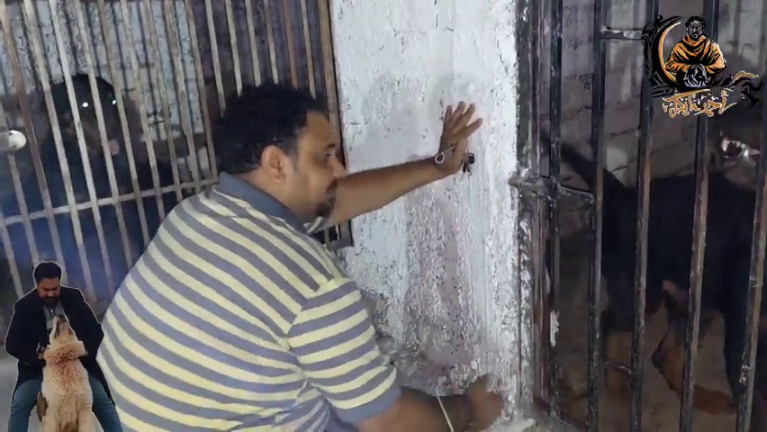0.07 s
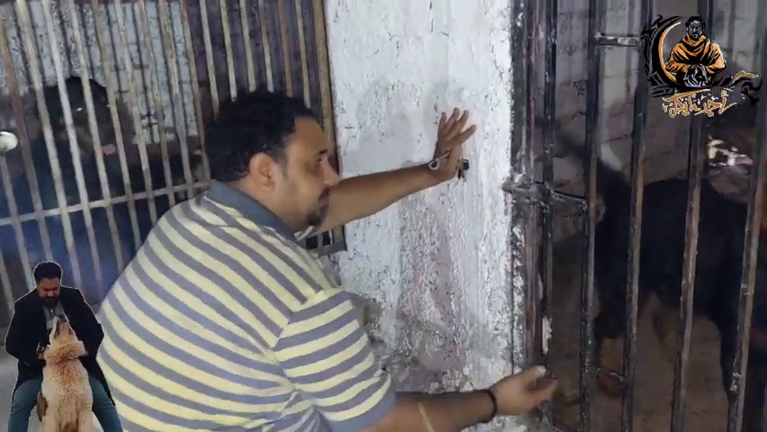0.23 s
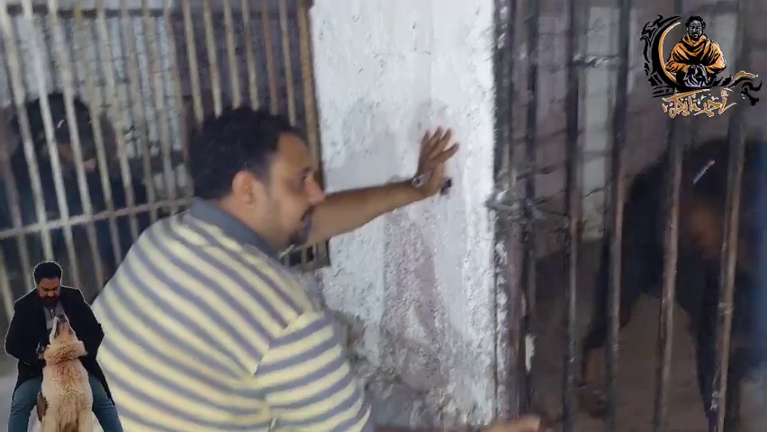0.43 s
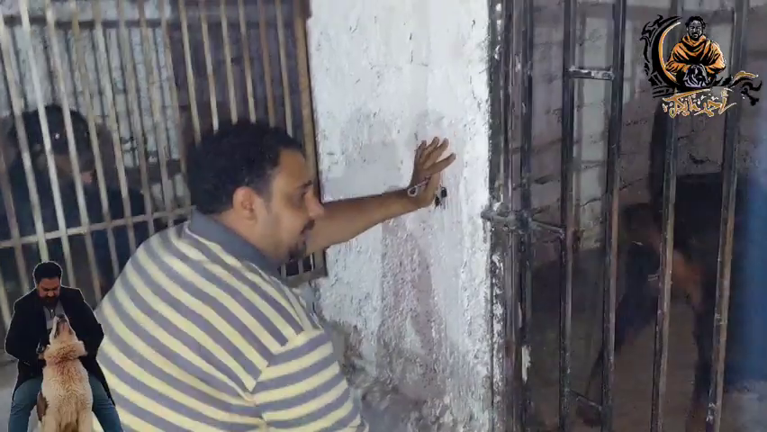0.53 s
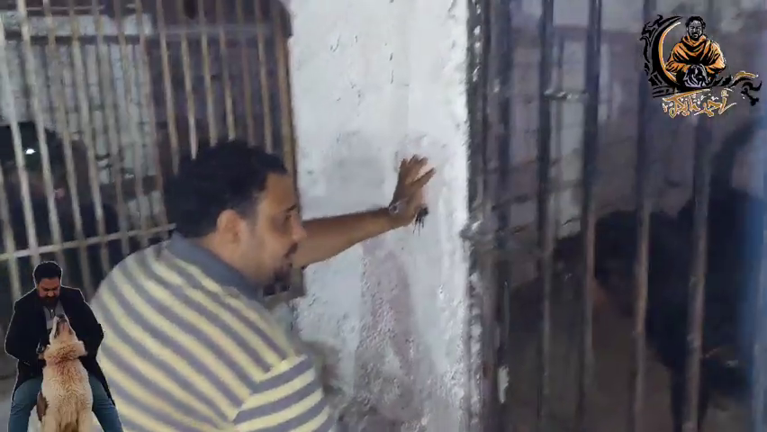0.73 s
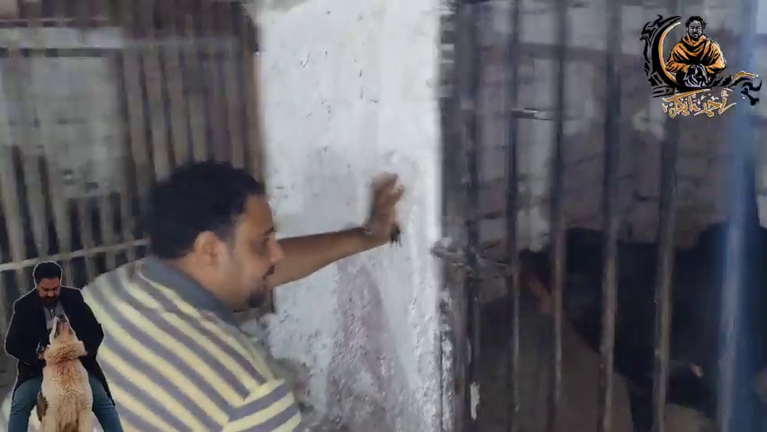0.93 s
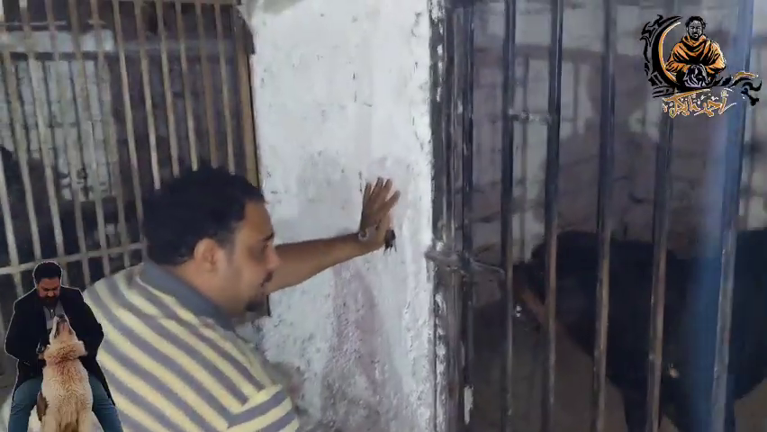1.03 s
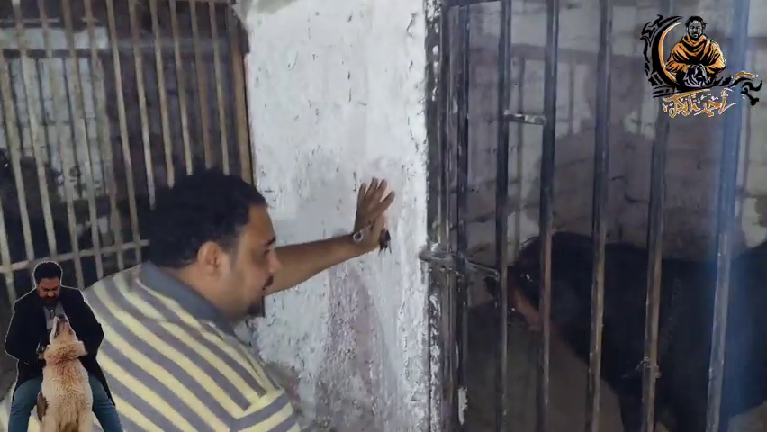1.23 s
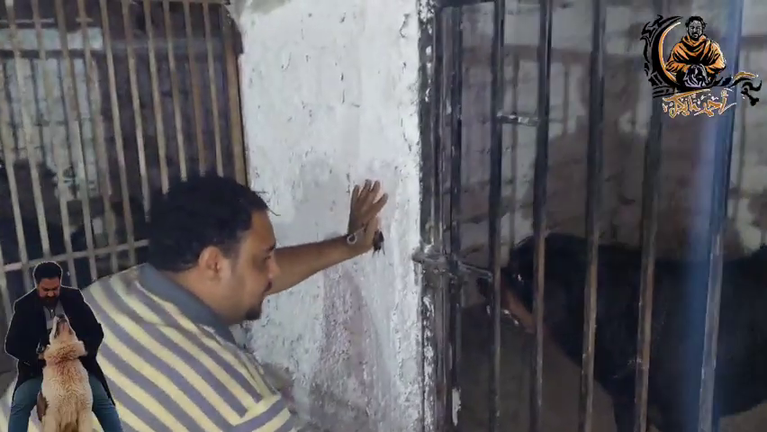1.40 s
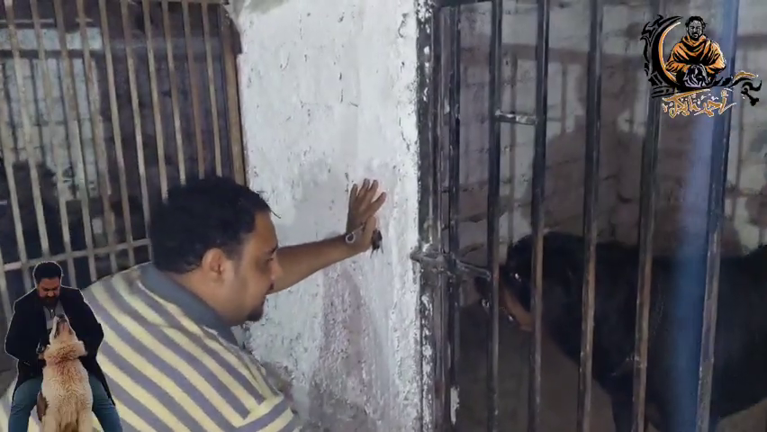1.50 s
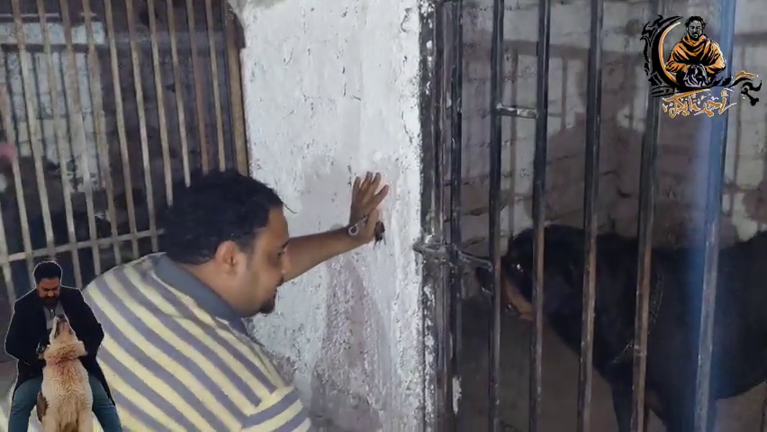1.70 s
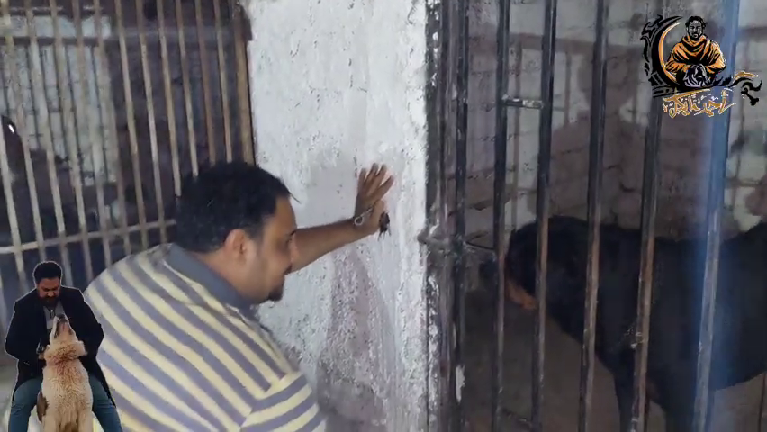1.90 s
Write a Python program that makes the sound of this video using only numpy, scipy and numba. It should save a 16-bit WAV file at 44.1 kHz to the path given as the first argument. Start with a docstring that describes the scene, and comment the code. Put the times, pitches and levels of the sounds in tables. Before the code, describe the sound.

Dogs barking in a bare barred kennel, caught by a nearby phone: two farther barks, three strong close ones, then light chain clinks, pants, soft paw thuds, one faint far bark and a groan.

```python
"""A dog further off barks twice over a brief low drone; then a big dog, close to a phone, barks three times.
They are behind the bars of a bare concrete kennel. The far dog barks once more and trails into a groan.
A collar chain clinks, the near dog pants, paws thud; the hard cell rings and room air lies underneath.
Barks are uneven pulses and gated noise through resonances; pants are filtered noise; links are decaying modes;
thuds and drone are sines. Cell modes, scattered wall echoes and a delay network make the room."""
import sys
import numpy as np
from scipy import signal
from scipy.fft import rfft, irfft
from scipy.io import wavfile
from scipy.ndimage import uniform_filter1d
from numba import njit

SR = 44100
rng = np.random.default_rng(int(sys.argv[2]) if len(sys.argv) > 2 else 0)


def decibels_to_gain(level_db):
    """Convert a level in decibels to a linear amplitude gain (20 dB per decade)."""
    exponent = np.asarray(level_db, float) / 20
    return 10 ** exponent


def log_audio(samples):
    """Write samples as a 16-bit WAV file to the path given in sys.argv[1]."""
    # one column per channel
    frames = np.atleast_2d(samples).T
    # limit to full scale, then quantise
    limited = np.clip(frames, -1, 1)
    pcm = np.round(limited * 32767).astype(np.int16)
    wavfile.write(sys.argv[1], SR, pcm)


N = 85995
T = np.arange(N) / SR


def on_log(table, hz):
    """Interpolates (Hz, value) points on a log frequency axis."""
    points = np.array(table, float)
    return np.interp(np.log(np.maximum(hz, 1)), np.log(points[:, 0]), points[:, 1])


def unit(x):
    """Scales to rms 1."""
    return x / np.sqrt(np.mean(x ** 2))


def even(x):
    """Flattens the short-term rms to 1."""
    return x / np.sqrt(uniform_filter1d(x ** 2, size=1300) + 1e-12)


@njit
def svf(x, hz, width):
    """State-variable band-pass with a moving centre, gain 1 there."""
    y, band_state, low_state = np.empty(len(x)), 0., 0.
    for i in range(len(x)):
        g, k = np.tan(np.pi * hz[i] / SR), width / hz[i]
        v = (band_state + g * (x[i] - low_state)) / (1 + g * (g + k))
        band_state = 2 * v - band_state
        low_state += 2 * g * v
        y[i] = k * v
    return y


def band(x, hz, width_hz):
    """Steep resonance: two band-passes in series, each 1.2 times the nominal width."""
    hz = hz + np.zeros(len(x))
    return svf(svf(x, hz, 1.2 * width_hz), hz, 1.2 * width_hz)


def ring(x, modes, settle=False):
    """Sum of decaying modes (Hz, dB, t60 s); settle scales each to unit energy."""
    out = 0
    for hz, db, t60_s in modes:
        pole = np.exp(2j * np.pi * hz / SR - np.log(1000) / (t60_s * SR))
        scale = np.sqrt(1 - abs(pole) ** 2) if settle else 1
        out = out + decibels_to_gain(db) * signal.lfilter([1], [1, -pole], x).imag * scale
    return out


# Spectrum of the room air. Each row: frequency in Hz, level in dB.
AIR_SPECTRUM = [(25, -23), (60, -8), (100, -1.5), (200, -3.5), (330, 4.5), (700, -8.5), (2000, -12.5),
                (3000, -18.5), (6000, -18), (9000, -25), (12000, -27), (16000, -26)]
# Course of the air. Each row: time in s, treble level in dB before AIR_GAIN_DB, bass relative to treble in dB.
AIR_COURSE = [(0.0, -59.5, 17), (0.536, -55, 10), (0.65, -63.5, 6), (0.847, -61.5, 14), (0.994, -65, 16.5),
              (1.432, -75.5, 13.5), (1.678, -72.5, 7), (1.95, -76.5, 13)]
AIR_GAIN_DB = 12


def air():
    """Room air and rumble: shaped stereo noise, bass and treble moving apart, mostly sinking."""
    f = np.fft.rfftfreq(N, 1 / SR)
    time_s, treble_db, bass_db = np.array(AIR_COURSE).T
    mid, side = rfft(rng.standard_normal((2, N))) * decibels_to_gain(on_log(AIR_SPECTRUM, f))
    # share of side noise by Hz
    side = side * on_log([(50, 0.97), (150, .3), (2000, 0.95), (5500, 1.0), (7000, .15)], f)
    both = np.array([mid + side, mid - side]) / np.sqrt(np.mean(irfft(mid, N) ** 2))
    low = 1 / (1 + (f / 250) ** 4)
    treble = irfft(both * (1 - low), N)
    bass = irfft(both * low, N)
    level = decibels_to_gain(AIR_GAIN_DB + np.interp(T, time_s, treble_db))
    return level * (treble + decibels_to_gain(np.interp(T, time_s, bass_db)) * bass)


# Low drone. Each row: time in s, frequency in Hz, rms level in dB.
DRONE_COURSE = [(0.0, 106.3, -44), (0.086, 91.8, -37), (0.128, 100.4, -46), (0.148, 101, -41.5),
                (0.226, 94.8, -39.5), (0.318, 104.3, -29.5), (0.42, 96, -61.5)]


def drone():
    """A low sine of gliding pitch that swells, then fades out."""
    time_s, hz, db = np.array(DRONE_COURSE).T
    level_db = np.interp(T, time_s, db) - 400 * np.maximum(T - time_s[-1], 0)
    phase = 2 * np.pi * np.cumsum(np.interp(T, time_s, hz)) / SR
    return np.sqrt(2) * decibels_to_gain(level_db) * np.sin(phase)


@njit
def walls(x, lags, gain, damp):
    """Eight delay lines that feed each other, duller each round."""
    line, soft, out = np.zeros((8, 4096)), np.zeros(8), np.zeros((2, len(x)))
    for i in range(len(x)):
        total = 0.
        for k in range(8):
            soft[k] += (1 - damp) * (gain[k] * line[k, (i - lags[k]) & 4095] - soft[k])
            total += soft[k]
            out[k % 2, i] += soft[k]
        for k in range(8):
            line[k, i & 4095] = x[i] + soft[k] - total / 4
    return out


HALL_DB, HALL_T60_S, HALL_DAMP = -18, .5, 0.54  # t60 before damping


def hall(x):
    """Diffuse tail: delay-line gains set the decay, damping shortens the treble."""
    lags = np.array([521, 683, 877, 1031, 1259, 1493, 1787, 2113])
    return decibels_to_gain(HALL_DB) * walls(x, lags, decibels_to_gain(-60 * lags / SR / HALL_T60_S), HALL_DAMP)


WALLS_DB, WALLS_S = -5, .014


def first_echoes(x):
    """Sparse random reflections off the cell walls, unlike left and right, mostly above the bass."""
    n = int(WALLS_S * SR)
    taps = rng.standard_normal((2, n)) * (rng.random((2, n)) < .04)
    taps = taps / np.sqrt(np.sum(taps ** 2, axis=1, keepdims=True))
    x = signal.sosfilt(signal.butter(1, (700, 6000), "band", fs=SR, output="sos"), x)
    return decibels_to_gain(WALLS_DB) * signal.fftconvolve(x[None], taps, axes=1)[:, :N]


# Ringing of the cell. Each row: frequency in Hz, relative level in dB, t60 in s.
CELL_MODES = [(317, -4, .11), (358, -6, .12), (454, -1, .14), (520, 5, .12), (650, -4, .12), (688, -1, .12),
              (766, 0, .12), (815, 2, .16), (930, -8, .1), (1205, -7, .1), (1535, -1, .14), (1612, -4, .12)]
CELL_DB = -21


def cell(x):
    """The hard cell rings at its own modes, each of equal energy before its level."""
    return decibels_to_gain(CELL_DB) * ring(x, CELL_MODES, settle=True)


# Microphone ports. Each row: frequency in Hz, lead of the left in rad.
PORT_LEAD = [(100, -.2), (500, -.55), (1200, -.6), (1700, -1.3), (2500, -1.7), (5000, -1.6), (6500, -.4)]
LEFT_OVER_RIGHT_DB = -1.1


def ports(mono):
    """Two ports hear one sound with opposite halves of a phase and level difference."""
    f = np.fft.rfftfreq(N, 1 / SR)
    left = np.exp(.5j * on_log(PORT_LEAD, f)) * decibels_to_gain(LEFT_OVER_RIGHT_DB / 2)
    return irfft(rfft(mono) * np.array([left, 1 / left]), N)


# Paws. Each row: start in s, nominal level in dB, frequency in Hz.
PAWS = [(0.477, -37, 92.6), (0.586, -36, 90), (0.664, -42, 87.7), (0.72, -35.5, 88.8), (0.811, -36, 106.5),
        (1.018, -36.5, 73.8), (1.171, -42, 96.2), (1.334, -43, 110.2), (1.481, -37.5, 75.6),
        (1.61, -44, 114.4), (1.711, -42, 84.8), (1.786, -48, 95), (1.861, -44, 80)]
PAW_T60_S, PAW_RISE_S = 0.11, 0.048


def paws():
    """Soft thuds: low sines with a slow rise and exponential decay."""
    out = np.zeros(N)
    for start_s, db, hz in PAWS:
        u = np.maximum(T - start_s, 0)
        swell = (1 - np.exp(-u / PAW_RISE_S)) * decibels_to_gain(-60 * u / PAW_T60_S)
        out += 2 * decibels_to_gain(db) * np.sin(2 * np.pi * hz * u) * swell
    return out


# Chain clinks. Each row: time in s, nominal level in dB.
CHAIN_CLINKS = [(0.3457, -41), (0.4518, -46), (0.5503, -58), (0.5853, -44), (0.62, -47.5), (0.7082, -35),
                (0.7816, -45), (0.832, -51), (1.0548, -60), (1.1364, -49), (1.1609, -55.5), (1.2715, -53)]
# Modes of a link. Each row: frequency in Hz, level in dB, t60 in s.
LINK_MODES = [(7255, 3, 0.045), (7900, -20.5, 0.062)]
LINK_TOUCH_S = .003


def chain():
    """Links slide together: short tone bursts, not snaps, excite the link modes."""
    tick = np.zeros(N)
    for start_s, db in CHAIN_CLINKS:
        tick[int(start_s * SR)] = decibels_to_gain(db)
    k = int(LINK_TOUCH_S * SR)
    touch = np.hanning(k) * np.cos(2 * np.pi * LINK_MODES[0][0] * np.arange(k) / SR) * 4 / k
    return ring(np.convolve(tick, touch)[:N], LINK_MODES)


# Pants. Each row: start in s, length in s, level in dB, sag as a share, three starting resonances in Hz.
PANT_BREATHS = [(1.142, 0.13, -51.5, 0.02, 1241, 2130, 3270), (1.724, 0.16, -56.5, 0.13, 1028, 2176, 340),
                (1.84, 0.056, -67, 0.034, 925, 1960, 316)]
# Each row: nominal widths in Hz of the three resonances of one pant.
PANT_WIDTHS = [(250., 220., 420.), (90., 200., 60.), (100., 250., 60.)]
PANT_FLUTTER_HZ = 55


def pants():
    """Fluttering breath noise through three sagging resonances."""
    out = np.zeros(N)
    for (start_s, length_s, db, sag, *res_hz), widths_hz in zip(PANT_BREATHS, PANT_WIDTHS):
        u = np.clip((T - start_s) / length_s, 0, 1)
        breath = rng.standard_normal(N) * (1 + .8 * np.sin(2 * np.pi * PANT_FLUTTER_HZ * T))
        tone = np.zeros(N)
        for hz, width_hz, res_db in zip(res_hz, widths_hz, (-4, 0, 0)):
            tone += unit(band(breath, hz * (1 - sag * u), width_hz)) * decibels_to_gain(res_db)
        out += decibels_to_gain(db) * tone * np.sin(np.pi * np.sqrt(u))
    return out


@njit
def folds(hz, weak, stretch, size):
    """A pulse per vocal-fold cycle, every other one weaker; also returns the cycle phase."""
    out, phase, p, k = np.zeros(len(hz) + 1), np.empty(len(hz)), 0., 0
    for i in range(len(hz)):
        step = hz[i] * stretch[k] / SR
        p += step
        if p >= 1:
            p, k = p - 1, k + 1
            a = size[k] * (1 - weak[i] * (k % 2))
            # split between two samples for exact timing
            out[i] += a * p / step
            out[i + 1] += a * (1 - p / step)
        phase[i] = p
    return out[:-1], phase


WALK_S = .035


def walk(n):
    """Slow random drift, rms 1: noise averaged twice."""
    k = int(WALK_S * SR)
    return unit(uniform_filter1d(uniform_filter1d(rng.standard_normal(n), size=k), size=k))


def restless(x, table, patchy_db, drift):
    """Resonances of alternating sign whose centres wander and whose levels flicker."""
    n, out = len(x), 0
    for k, (hz, width_hz, db) in enumerate(table):
        level = (-1) ** k * decibels_to_gain(db + patchy_db * walk(n)) / np.sqrt(width_hz / hz)
        out = out + level * band(x, hz * (1 + drift * walk(n)), width_hz)
    return out


# Throat resonances. Each row: centre in Hz, nominal width in Hz, level in dB before rasp.
THROAT_RES = [(1010, 160, 1), (1250, 180, 2), (1570, 220, 3), (1950, 240, -6), (2260, 200, -10)]
# Breath hiss resonances. Each row: centre in Hz, nominal width in Hz, level in dB.
HISS_RES = [(3400, 400, 0), (5350, 650, 5), (7000, 900, -6), (9000, 2500, -13), (11500, 3000, -9),
            (14500, 3500, -11)]
THROAT_PATCHY_DB, THROAT_DRIFT, RASP_FROM_HZ = 4.5, .045, 1800
HISS_PATCHY_DB, HISS_DRIFT, HISS_SLEW_S = 1.5, .02, .025
CHEST_WIDTH_HZ, HALF_LINE_DB = 120, -5  # partial at 1.5 x pitch when cycles alternate fully
VOICE_BAND_HZ = (225, 2500)


def call(table, rough, weak, chest_db, mouth_hz, rasp_db):
    """One voice: uneven pulses and gated air through chest, moving mouth and throat, hiss on top."""
    rows = np.array(table, float)
    i0, i1 = int(rows[0, 0] * SR), min(int(rows[-1, 0] * SR), N)
    hz, db, mouth, upper_db, hiss_db = (np.interp(T[i0:i1], rows[:, 0], rows[:, k]) for k in range(1, 6))
    n = i1 - i0
    weak_share = np.linspace(*weak, n)
    jitter, shimmer = rng.standard_normal((400, 2)).T
    pulses, phase = folds(hz, weak_share, 1 + .12 * rough * jitter, decibels_to_gain(9 * rough * shimmer))
    breath = rng.standard_normal(n) * np.exp(-phase / 0.15)  # strongest just after each pulse
    source = unit(pulses - pulses.mean()) * (1 - rough) + rough * unit(breath) * 2

    low = even(band(source, mouth, mouth_hz))
    chest = even(band(pulses, np.maximum(hz, 280), CHEST_WIDTH_HZ))
    low = low - decibels_to_gain(np.linspace(*chest_db, n)) * chest
    half_line = even(band(pulses, hz * 3 / 2, CHEST_WIDTH_HZ))
    low = low + decibels_to_gain(HALF_LINE_DB) * weak_share ** 2 * half_line

    throat = [(f, w, g + rasp_db * (f > RASP_FROM_HZ)) for f, w, g in THROAT_RES]
    upper = even(restless(source, throat, THROAT_PATCHY_DB, THROAT_DRIFT))
    hiss = unit(restless(breath + 0.38 * rng.standard_normal(n), HISS_RES, HISS_PATCHY_DB, HISS_DRIFT))

    edge = np.clip(np.minimum(np.arange(n), n - np.arange(n)) / (0.002 * SR), 0, 1)
    voice_filter = signal.butter(6, VOICE_BAND_HZ, "band", fs=SR, output="sos")
    voice = decibels_to_gain(db) * signal.sosfilt(voice_filter, low - decibels_to_gain(upper_db) * upper)
    # hiss swells more slowly than the voice
    hiss_level = decibels_to_gain(uniform_filter1d(db + hiss_db, size=int(HISS_SLEW_S * SR)))
    out = np.zeros(N)
    out[i0:i1] = edge * (voice + hiss_level * hiss)
    return out


# Far dog, one list per bark. Each row: time in s, pitch in Hz, level in dB, mouth resonance in Hz,
# throat relative in dB, hiss relative in dB.
FAR_BARKS = [
    [(0.0, 432.6, -27.5, 465, 2.5, -11), (0.02, 434.3, -24, 445, -17.5, -27),
     (0.07, 448.7, -45.5, 404, 3, -82), (0.12, 411.5, -40.5, 670, 3.5, -9.5),
     (0.15, 448, -52.5, 585, -2, -37), (0.16, 410, -37.5, 565, 6, -38.5)],
    [(0.16, 460.5, -38.5, 510, -10, -15), (0.184, 429.8, -34, 654, -5.5, -27.5),
     (0.214, 402.6, -31, 856, 0, -29.5), (0.226, 406.3, -22, 805, -5.5, -32),
     (0.326, 399.3, -35, 470, -3.5, -21.5), (0.36, 415, -32.5, 630, -0.5, -10)],
    [(1.265, 301.9, -52, 460, -4, -28), (1.288, 315.3, -47.5, 576, -0.5, -24),
     (1.325, 384.8, -44.5, 766, 4.5, -34.5), (1.36, 408.3, -40, 790, -3, -20),
     (1.41, 394.7, -38, 430, -8.5, -34), (1.47, 372.8, -50, 409, -3, -35.5),
     (1.56, 366, -59, 390, -18, -39)],
]
# Each row, one per bark: hoarseness 0-1, weak-cycle share 0-1 at start and end,
# chest relative in dB at start and end, nominal mouth width in Hz, rasp in dB.
FAR_VOICE = [(.38, (.2, .2), (-2, -2), 260, 2), (.38, (.15, .15), (-6, -6), 200, 4), (.3, (.1, .1), (-6, 1),
             300, 9)]
# Groan, columns as FAR_BARKS: s, Hz, dB, Hz, dB, dB.
GROAN_COURSE = [(1.49, 119, -64, 560, -5, -25), (1.55, 114, -60, 615, -8, -25),
                (1.59, 109.5, -57, 600, -10, -25), (1.64, 103.5, -62, 570, -8, -25),
                (1.69, 98, -70, 550, -8, -25)]
# Groan voice, one row as FAR_VOICE: 0-1, 0-1 pair, dB pair, Hz, dB.
GROAN_VOICE = (.12, (0., 0.), (-10, -10), 130, 4)


def far_dog():
    """Three barks and a low groan from the same kind of vocal tract."""
    return sum(call(bark, *voice) for bark, voice in zip(FAR_BARKS, FAR_VOICE)) + call(GROAN_COURSE, *GROAN_VOICE)


# Near dog, one list per bark. Each row: time in s, pitch in Hz, level in dB, mouth resonance in Hz,
# throat relative in dB, hiss relative in dB.
NEAR_BARKS = [
    [(0.352, 301.8, -42, 650, 17, -9), (0.364, 293.6, -16.5, 707, -8.5, -33),
     (0.385, 279.9, -15, 686, -1, -22), (0.4, 299, -15.5, 640, -1.5, -22.5),
     (0.422, 358.7, -17, 734, 0.5, -29.5), (0.442, 339.2, -12.5, 660, -4, -31.5),
     (0.465, 387.6, -15.5, 740, -5.5, -20.5), (0.485, 384.2, -15.5, 817, -12.5, -32),
     (0.5, 351.2, -20, 740, -4, -28.5), (0.53, 359, -20.5, 780, -23, -38.5),
     (0.56, 297, -38.5, 700, -11.5, -35.5)],
    [(0.598, 308.1, -24, 775.3, 2, -18), (0.612, 309, -15.5, 775, -19.5, -38.5),
     (0.632, 316.5, -20, 740, 7, -25), (0.645, 365.7, -11.5, 776, -21, -22),
     (0.66, 389.1, -12, 810, -14, -27), (0.69, 403.1, -15, 795, -0.5, -31),
     (0.706, 394.6, -22.5, 720, -0.5, -23.5), (0.736, 341.5, -15.5, 790, -12, -26.5),
     (0.765, 321.1, -24, 788, -22, -35), (0.82, 303.3, -49, 750, -32, -16.5)],
    [(0.862, 308, -28, 791.6, -32, -19), (0.878, 315, -30.5, 820, 5, -22),
     (0.894, 326.6, -15.5, 819, -4.5, -33), (0.912, 335.8, -20, 800, -9, -21),
     (0.93, 350.5, -16, 675, -10, -23.5), (0.968, 363.6, -16.5, 690, -27, -34),
     (0.995, 343.3, -25.5, 700, -20.5, -23.5), (1.014, 321.4, -19.5, 784, -12.5, -33),
     (1.03, 318.6, -40, 790, 5.5, -20.5), (1.07, 318, -39, 780, -24, -36.5)],
]
# Each row, one per bark: hoarseness 0-1, weak-cycle share 0-1 at start and end,
# chest relative in dB at start and end, nominal mouth width in Hz, rasp in dB.
NEAR_VOICE = [(.32, (.25, .02), (-13, -14), 260, -2), (.36, (.0, .95), (-22, -4), 300, -5), (.23, (.8, .75),
              (-6, -4), 420, -5)]


def near_dog():
    """Three loud barks of uneven vocal-fold pulses, each with its own hoarseness."""
    return sum(call(bark, *voice) for bark, voice in zip(NEAR_BARKS, NEAR_VOICE))


FAR_WET_DB = 3


def scene():
    """Sources direct, through cell modes, wall echoes and hall; the far dog feeds the room more."""
    near, far = near_dog(), far_dog()
    small = pants() + chain() + paws()
    wet = near + decibels_to_gain(FAR_WET_DB) * far + small + 1e-18
    mono = near + far + small + drone() + cell(wet)
    return ports(mono) + first_echoes(wet) + hall(wet) + air()


def low_pass(x):
    """Removes everything above the highest recorded frequency."""
    return signal.sosfilt(signal.butter(12, 15800, fs=SR, output="sos"), x)


TOP = .96  # highest swing the phone passes


def record(dry):
    """The phone rounds the highest peaks."""
    mix = dry / (1 + (dry / TOP) ** 4) ** (1 / 4)
    return low_pass(mix)


dry = scene()
out = record(dry)
log_audio(out)
```